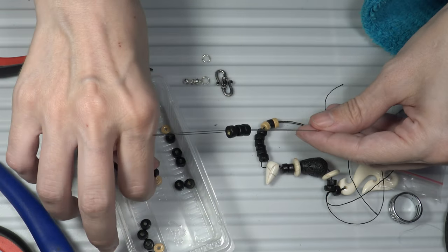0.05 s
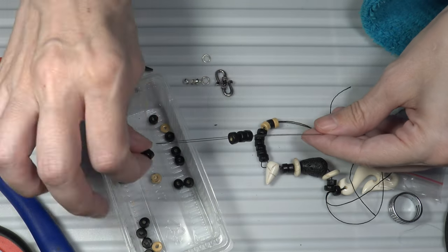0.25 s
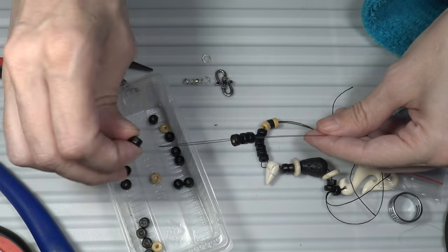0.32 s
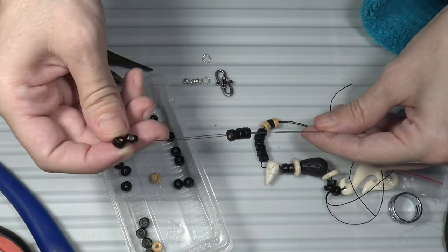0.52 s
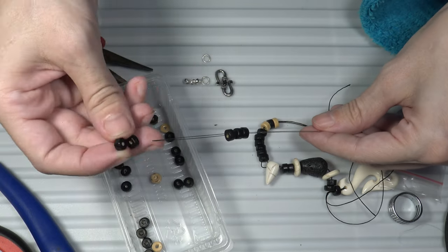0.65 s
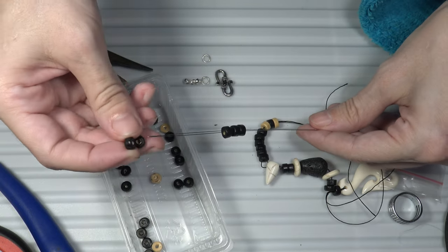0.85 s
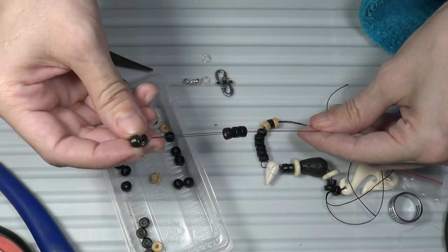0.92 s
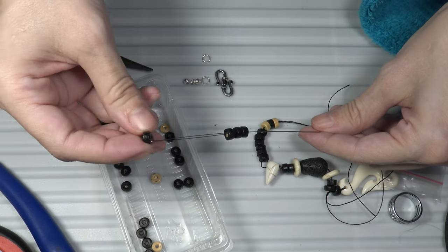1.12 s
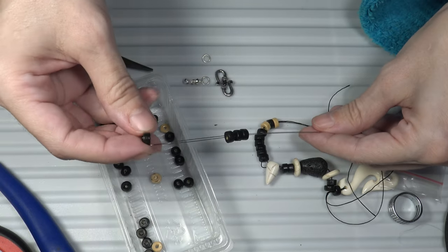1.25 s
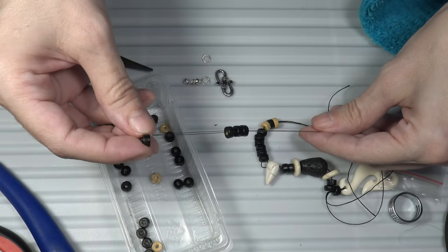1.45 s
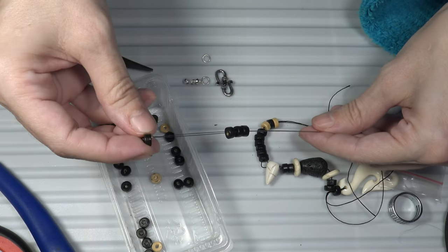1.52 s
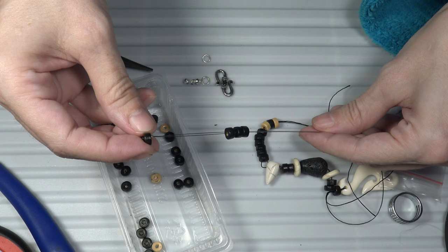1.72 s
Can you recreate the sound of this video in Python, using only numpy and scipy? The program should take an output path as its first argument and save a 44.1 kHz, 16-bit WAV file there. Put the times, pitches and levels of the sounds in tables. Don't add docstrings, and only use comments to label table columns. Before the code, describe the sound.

Small beads click and rattle briefly in a thin plastic tray, then a quiet humming room remains

```python
import sys
import numpy as np
from scipy import signal
from scipy.fft import rfft, irfft, next_fast_len
from scipy.io import wavfile

SR = 44100
rng = np.random.default_rng(int(sys.argv[2]) if len(sys.argv) > 2 else 0)


def master_out(mix):
    frames = np.transpose(np.atleast_2d(mix))
    ceiling = np.clip(frames, -1, 1)
    pcm = np.round(ceiling * 32767).astype(np.int16)
    wavfile.write(sys.argv[1], SR, pcm)


def how_loud(loudness_db):
    steps = np.asarray(loudness_db, float) / 20
    return 10 ** steps


N = 79380

# start in seconds, peak level in dB, burst length in seconds,
# brightness in dB per octave.
CHATTER = [(.0285, -45, .0015, 0), (.049, -50, .003, 2), (.0575, -50, .001, -2), (.075, -48, .0015, 0),
           (.0995, -52, .001, 0), (.1045, -45, .001, 1), (.1074, -49, .001, -1), (.1685, -49, .002, 0),
           (.179, -40, .0015, 0), (.187, -40, .0015, -2), (.196, -41, .003, -2), (.2046, -17, .002, 0),
           (.2068, -17, .0015, 1), (.2082, -16, .0012, -1), (.2115, -25, .002, -4), (.2238, -26, .003, -1),
           (.232, -29, .003, 0), (.2348, -19, .0025, 0), (.2365, -22, .002, 1), (.2405, -25, .0015, -2),
           (.2495, -26, .003, 1), (.262, -30, .003, 0), (.2685, -36, .002, 0), (.275, -30, .003, 0),
           (.2865, -38, .002, -1), (.2965, -43, .002, 1), (.3245, -41, .003, 1), (.3364, -45, .002, -2)]
# start in seconds, peak level in dB, burst length in seconds,
# brightness in dB per octave.
LIFT_KNOCKS = [(.3175, -47, .001, 1), (.3714, -49, .001, 1), (.3778, -40, .0008, 1), (.3814, -46, .001, 2),
               (.3884, -26, .0012, 1.5), (.399, -45, .002, 3), (.4064, -27, .001, 0),
               (.4107, -30, .0012, 1), (.4150, -32, .001, 1), (.4190, -39, .001, 1), (.4234, -43, .001, 0),
               (.4324, -41, .001, 0)]
CHATTER_RISE, KNOCK_RISE = 0.15, 0.04
# frequency in Hz, width in Hz, level in dB.
TRAY_MODES = [(1340, 404, -7.5), (1925, 215, -4.5), (2290, 340, -7), (3154, 420, -2.5), (3964, 460, 0.5),
              (4476, 550, 1), (5840, 300, -3.5), (6220, 210, -5.5), (7930, 1140, -6), (9030, 450, -3),
              (11540, 3400, -12.5)]
PITCH_SCATTER, MODE_SCATTER_DB = 0.029, 2.5
# time in seconds, strength in dB, brightness from 0 to 1.
ROLLING = [(0, -41, 0.6), (0.02, -53.5, 0.15), (.06, -64, 0.4), (.13, -65.5, 0), (.165, -64.5, 0.3),
           (.202, -52.5, 0.3), (.215, -37.5, 0.2), (.243, -35, 0.35), (0.269, -36, 0.7),
           (0.294, -50.5, 0.02), (.34, -52.5, 0.27), (.362, -60, 0), (.403, -55.5, 0.55), (.418, -44, 0.75),
           (0.434, -54.5, 0.33), (.48, -66, 0)]
KNOCKS_PER_SECOND, KNOCK_SPREAD_DB = 7000, 2.5
ROLL_TILT_DB = 6.5
# start in seconds, level in dB, contact time in seconds.
TRAY_THUMPS = [
    (.2062, -32, 0.00023),
    (0.2366, -44, 0.00051),
    (.389, -56, .0004),
]
# frequency in Hz, width in Hz, level in dB.
TABLE_MODES = [(83.5, 28, -7.5), (174.5, 10.4, 8), (257, 45, 1.5), (516, 62, 4), (690, 46, 2),
               (905, 80, -9), (1130, 56, 7), (1480, 260, -4)]

# frequency in Hz, left over right in dB.
NEAR_PAN = [(60, 4), (180, -2.5), (550, -1), (1650, 0.0), (4970, 2.5), (15000, 0)]
# frequency in Hz, share that differs between the microphones.
NEAR_WIDTH = [(1000, 0.047), (3000, 0.023), (8000, 0.16), (15000, 0.19)]
NEAR_WET_DB, NEAR_T60 = -24, 0.054

# start in seconds, length in seconds, frequency in Hz, level in dB.
RUMBLE_SWELLS = [(-0.003, 0.13, 218, -55.5), (0.056, 0.14, 189.3, -51.5), (0.219, 0.042, 257, -47),
                 (0.301, 0.11, 187, -55), (0.31, 0.16, 224, -57), (0.421, .11, 180.7, -48.5),
                 (.53, 0.092, 215, -54.5), (0.595, 0.098, 242, -55), (0.742, 0.099, 160, -62),
                 (1.066, 0.113, 213.4, -58), (1.077, 0.13, 328, -60.5), (1.124, 0.18, 451.8, -61.5),
                 (1.209, 0.15, 195.3, -55), (1.502, 0.12, 220.8, -56.5), (1.572, 0.16, 186, -54),
                 (1.713, 0.11, 225.2, -52)]
SWELL_PEAK, SWELL_DRIFT = 0.56, 0.02085
# frequency in Hz, density in dB per Hz.
AIR_SPECTRUM = [(15, -52), (30, -15.5), (110, -9), (165, 0.5), (330, -1), (500, -7), (750, -9.5),
                (1300, -35.5)]
# frequency in Hz, density in dB per Hz.
HISS_SPECTRUM = [(600, -19), (900, -3.5), (1150, -1.5), (1500, -9), (2090, -9.5), (4050, -17),
                 (16000, -21.5)]
AIR_DB, HISS_DB = -57.5, -61.5
# frequency in Hz, width in Hz, level in dB.
ROOM_HUM = [(446.2, 90, -61.5), (259.4, 10.5, -67.5), (714.6, 46, -75), (1071, 50, -75)]
# frequency in Hz, likeness from 0 to 1.
ROOM_LIKENESS = [(60, 0.9), (300, 0.95), (1400, .95), (3100, 0.95), (6500, 0.66), (15000, .85)]
# frequency in Hz, left over right in dB.
ROOM_PAN = [(60, -2), (130, 3.5), (290, -4.5), (640, -5.5), (1410, -4), (3100, 0), (6820, 0.0),
            (15000, -0.5)]
# frequency in Hz, gain in dB.
BAND_LIMIT = [(15700, 0), (15850, -30), (16400, -32), (16500, -90)]


def unit(x):
    return x / np.sqrt(np.mean(x ** 2) + 1e-20)


def along(points, hz):
    f, value = np.transpose(points)
    return np.interp(np.log(hz + 1), np.log(f + 1), value)


def filtered(x, response):
    length = x.shape[-1]
    size = next_fast_len(length + 4096)
    hz = np.fft.rfftfreq(size, 1 / SR)
    return irfft(rfft(x, size) * response(hz), size)[..., :length]


def body(modes, tilt_db=0):
    def response(f):
        total = 0
        for k, (center, width, db) in enumerate(modes):
            resonance = 1j * f * width / (center * center - f * f + 1j * f * width)
            total = total + (-1) ** k * how_loud(db) * resonance
        return how_loud(tilt_db * np.log2((f + 500) / 5000)) * total
    return response


def panned(pair, pan):
    sides = np.array([[1], [-1]])
    return filtered(pair, lambda hz: how_loud(along(pan, hz) / 2 * sides))


def bead_contact(length, rise, tilt_db):
    t = np.arange(2048) / SR
    length = max(length, 2e-4)
    envelope = (1 - np.exp(-t / (rise * length))) * np.exp(-t / length)
    burst = rng.standard_normal(len(t)) * envelope
    scatter = rng.standard_normal((len(TRAY_MODES), 2))
    modes = []
    for (hz, width, db), (a, b) in zip(TRAY_MODES, scatter):
        modes.append((hz * (1 + PITCH_SCATTER * a), width, db + MODE_SCATTER_DB * b))
    sound = filtered(burst, body(modes, tilt_db))
    return sound / abs(sound).max()


def bead_clicks():
    out = np.zeros(N + SR)
    for rows, rise in ((CHATTER, CHATTER_RISE), (LIFT_KNOCKS, KNOCK_RISE)):
        for start, db, length, tilt_db in rows:
            sound = bead_contact(length, rise, tilt_db)
            out[round(start * SR):][:len(sound)] += how_loud(db) * sound
    return out[:N]


def bead_rolling():
    start, db, brightness = np.transpose(ROLLING)
    t = np.arange(N) / SR
    chance, size, sign = rng.random((3, N))
    sizes = how_loud(-KNOCK_SPREAD_DB * np.log(size + 0.0007))
    knocks = (chance < KNOCKS_PER_SECOND / SR) * sizes * np.sign(sign - 0.5)
    dull = unit(filtered(knocks, body(TRAY_MODES, -ROLL_TILT_DB)))
    bright = unit(filtered(knocks, body(TRAY_MODES, 0.5 * ROLL_TILT_DB)))
    share = np.clip(np.interp(t, start, brightness), 0, 1)
    strength = how_loud(np.interp(t, start, db, right=-120))
    return strength * ((1 - share) * dull + share * bright)


def tray_thumps():
    out, t = np.zeros(N), np.arange(8192) / SR
    for start, db, contact in TRAY_THUMPS:
        blow = t / contact * np.exp(-t / contact)
        sound = filtered(blow, body(TABLE_MODES))
        out[round(start * SR):][:len(t)] += 2 * how_loud(db) * sound / abs(sound).max()
    return out


def near_sounds():
    near = bead_clicks() + bead_rolling() + tray_thumps()
    t = np.arange(SR // 4) / SR
    tail = rng.standard_normal((2, len(t))) * how_loud(-60 * t / NEAR_T60)
    tail = tail / np.linalg.norm(tail[0])
    wet = signal.fftconvolve(near[None], tail, axes=1)[:, :N]
    apart = filtered(near, lambda hz: 1j * along(NEAR_WIDTH, hz))
    return panned(near + [apart, -apart] + how_loud(NEAR_WET_DB) * wet, NEAR_PAN)


def rumble_swells():
    t, out = np.arange(N) / SR, np.zeros(N)
    for start, length, hz, db in RUMBLE_SWELLS:
        progress = np.clip((t - start) / length, 0, 1) ** (np.log(0.5) / np.log(SWELL_PEAK))
        drift, phase = rng.standard_normal(2)
        pitch = hz * (1 + SWELL_DRIFT * drift * (progress - 0.5))
        tone = np.sin(2 * np.pi * np.cumsum(pitch) / SR + 3 * phase)
        out += how_loud(db + 3) * np.sin(np.pi * progress) * tone
    return out


def room_noise(response):
    def mid_side(hz):
        angle = np.arccos(np.clip(along(ROOM_LIKENESS, hz), 0, 1)) / 2
        return response(hz) * [np.cos(angle), np.sin(angle)]
    mid, side = filtered(rng.standard_normal((2, N)), mid_side)
    return unit(np.array([mid + side, mid - side]))


def room_tone():
    air = how_loud(AIR_DB) * room_noise(lambda hz: how_loud(along(AIR_SPECTRUM, hz)))
    hum = np.zeros((2, N))
    for center, width, db in ROOM_HUM:
        mode = body([(center, width, 0)])
        hum += how_loud(db) * room_noise(lambda hz: mode(hz) ** 2)
    hiss = how_loud(HISS_DB) * room_noise(lambda hz: how_loud(along(HISS_SPECTRUM, hz)))
    return panned(air + hum + hiss + rumble_swells(), ROOM_PAN)


def scene():
    return near_sounds() + room_tone()


def band_limit(x):
    return signal.sosfilt(signal.butter(12, 16800, fs=SR, output="sos"), x)


def record(dry):
    mix = filtered(dry, lambda hz: how_loud(along(BAND_LIMIT, hz)))
    return band_limit(mix)


dry = scene()
out = record(dry)
master_out(out)
```